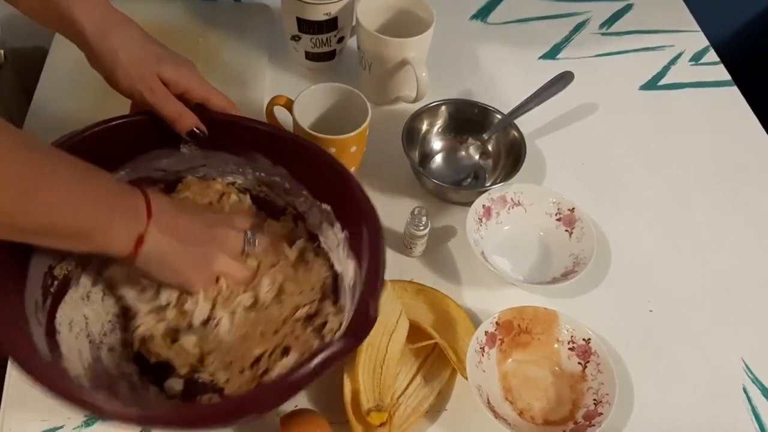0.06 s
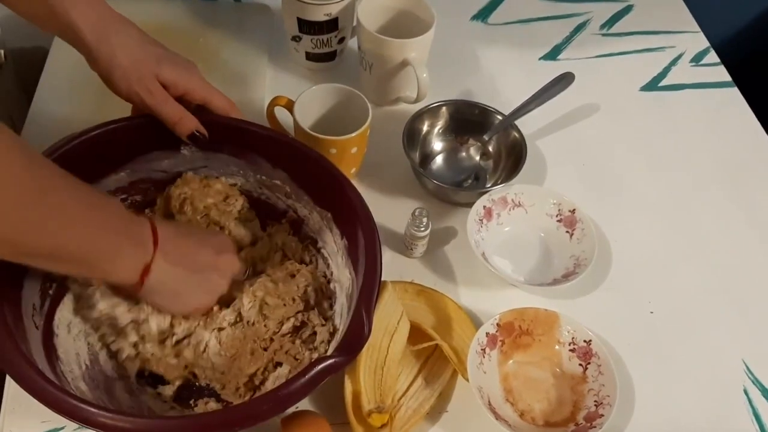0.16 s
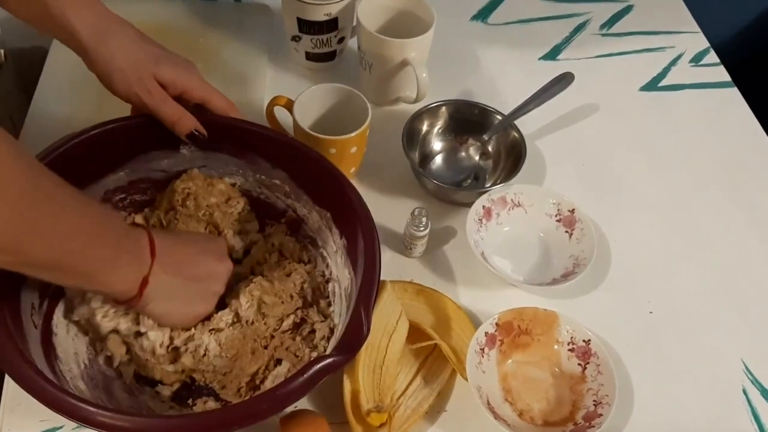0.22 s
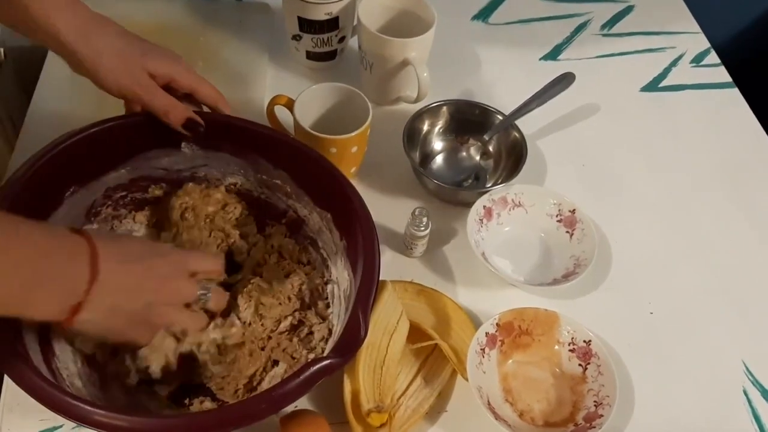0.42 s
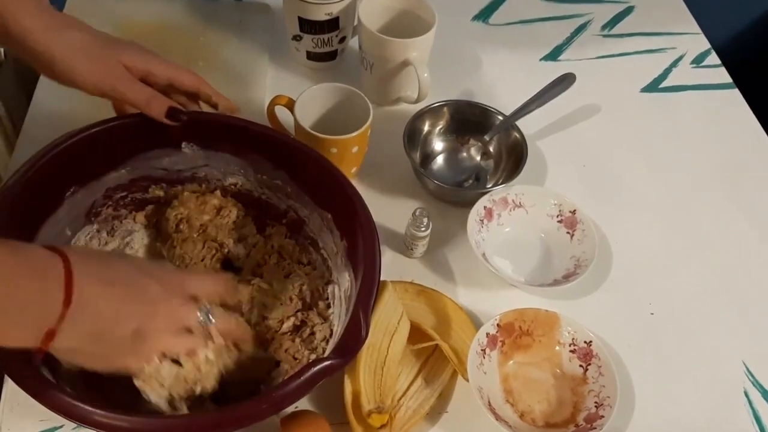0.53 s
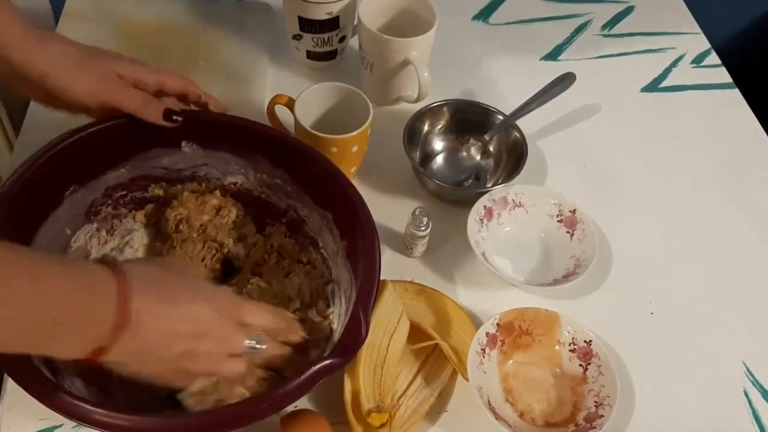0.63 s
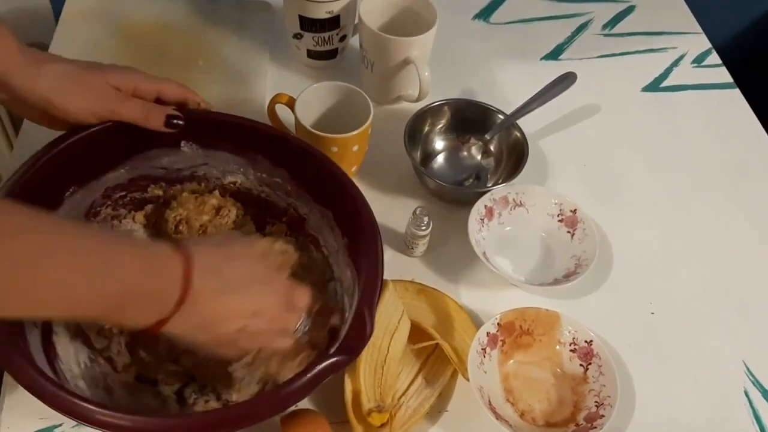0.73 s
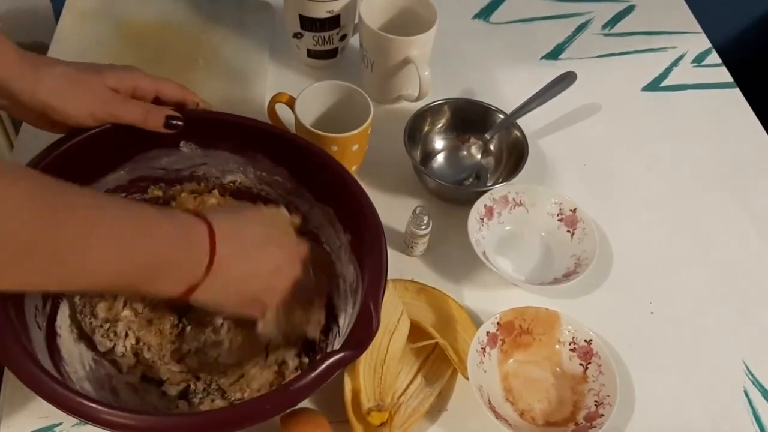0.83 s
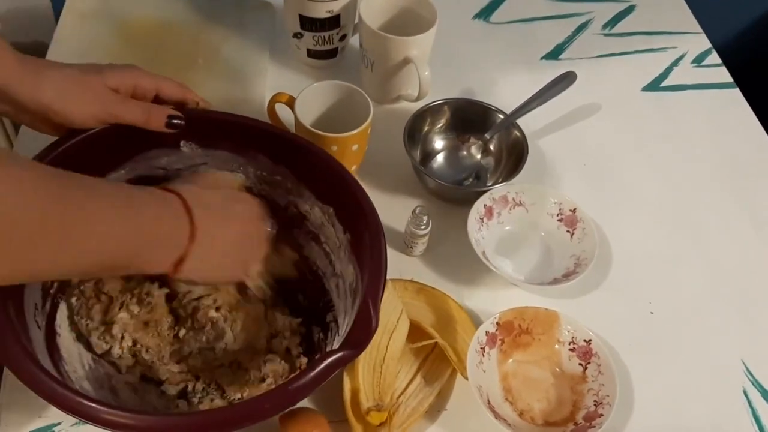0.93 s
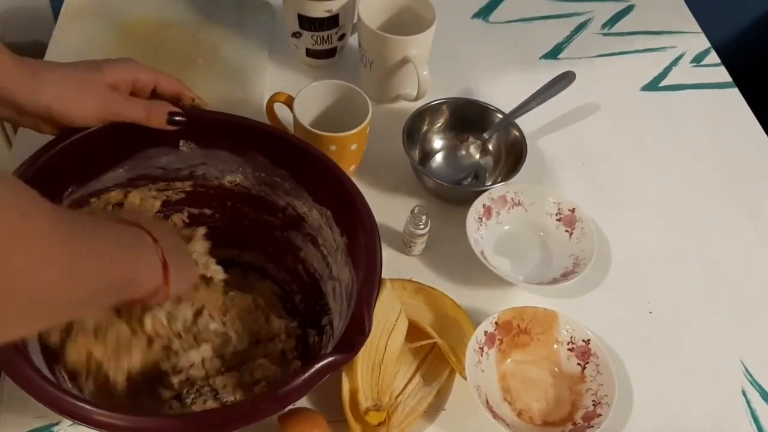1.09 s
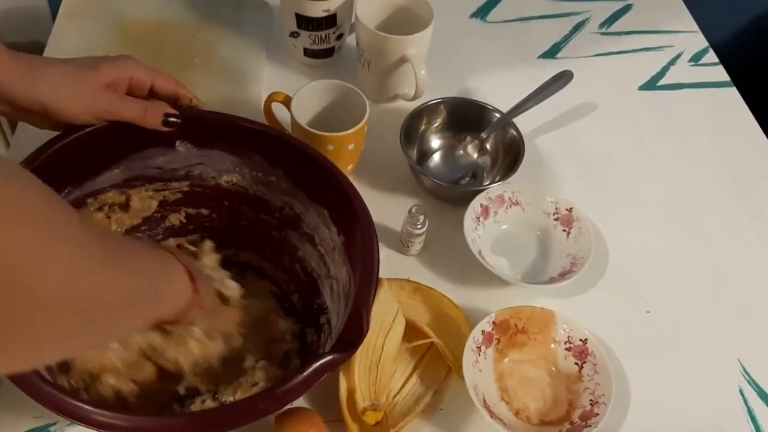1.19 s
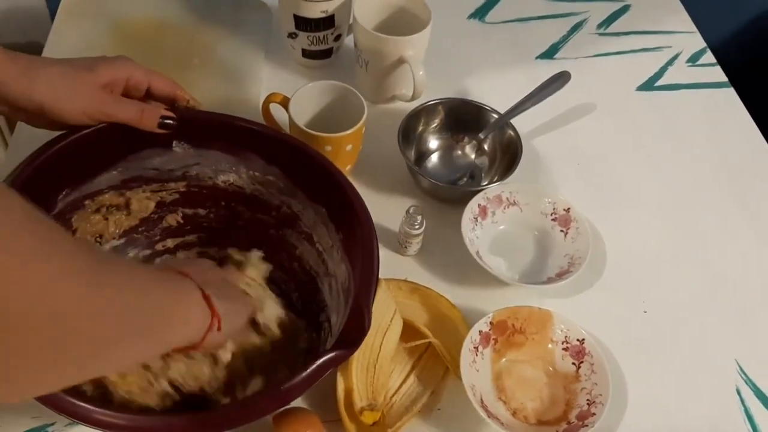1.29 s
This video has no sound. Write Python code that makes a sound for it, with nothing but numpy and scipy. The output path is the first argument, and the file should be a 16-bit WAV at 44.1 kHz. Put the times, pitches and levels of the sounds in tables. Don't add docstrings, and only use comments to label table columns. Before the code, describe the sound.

Sticky dough kneaded by hand, squishing and smacking, as the bowl bangs the table once early on

```python
import sys
import numpy as np
from scipy import signal
from scipy.io import wavfile

SR = 44100
rng = np.random.default_rng(int(sys.argv[2]) if len(sys.argv) > 2 else 0)


def persist_wave(psi):
    counts = np.round(np.clip(psi, -1, 1) * 32767).astype(np.int16)
    wavfile.write(sys.argv[1], SR, np.atleast_2d(counts).T)


def gain_from_db(level_db):
    decades = np.asarray(level_db, float) / 20
    return 10 ** decades


N = 59535
TIME = np.arange(N) / SR
LOW_PAN_DB, DOUGH_PAN_DB, KNOCK_PAN_DB = -3.5, -2, -2.5


def rms_one(x):
    return x / np.sqrt(np.mean(x ** 2) + 1e-20)


def in_time(rows):
    s, *columns = np.transpose(rows)
    return [np.interp(TIME, s, column) for column in columns]


def at_hz(points, hz):
    table_hz, values = np.array(points).T
    return np.interp(np.log(hz), np.log(table_hz), values)


def drift(rate_hz):
    r = np.exp(-80 * np.pi * rate_hz / SR)
    slow = signal.lfilter([1], [1, -2 * r, r * r], rng.standard_normal(N // 40 + 2002))[2000:]
    return np.interp(np.arange(N) / 40, np.arange(len(slow)), rms_one(slow))


def band_pass(x, low_hz, high_hz):
    return signal.sosfilt(signal.butter(2, [low_hz, high_hz], "band", fs=SR, output="sos"), x)


def ring(clicks, hz, t60):
    r, w = gain_from_db(-60 / (t60 * SR)), 2 * np.pi * hz / SR
    return signal.lfilter([0, np.sin(w)], [1, -2 * r * np.cos(w), r * r], clicks + 1e-18)


def clicks_at(s, heights):
    out = np.zeros(N)
    out[(np.asarray(s) * SR).astype(int)] = heights
    return out


def pan(db):
    return gain_from_db(np.array([[db / 2], [-db / 2]]))


def lagged(x):
    return np.array([x, np.roll(x, int(.00012 * SR))])


def noise():
    return rng.standard_normal((2, 2, N))


# f/Hz, likeness [0 to 1]
MIC_LIKENESS = [(60, 0.8), (300, 1), (1000, 0), (4000, 0), (14000, 0.083)]


def bands(spectrum, shape, white):
    out, power = 0, 0
    edges = 25 * 2 ** np.arange(0, 9.6, .5)
    for k, (low, high) in enumerate(zip(edges, edges[1:])):
        mid, side = band_pass(white[k % 2], low, high)
        hz = np.sqrt(low * high)
        alike = np.clip(at_hz(MIC_LIKENESS, hz), -1, 1)
        gain = gain_from_db(at_hz(spectrum, hz))
        power += gain ** 2 * np.mean(mid ** 2 + side ** 2)
        stereo = np.sqrt(1 + alike) * mid + np.sqrt(1 - alike) * side * [[1], [-1]]
        out = out + gain * shape(hz) * stereo
    return out / np.sqrt(power)


# f/Hz, level/dB per Hz
FLOOR_SPECTRUM = [(15, -56), (25, 1.5), (206, 2.5), (476, -3.5), (1070, -42), (1650, 8), (2050, -21),
                  (6560, -58), (16000, -38)]


def room_floor():
    return gain_from_db(-59.5) * bands(FLOOR_SPECTRUM, lambda hz: gain_from_db(1.9 * drift(26)), noise())


def rumble():
    low = band_pass(rng.standard_normal((2, N)), 59 * 0.79, 59 * 1.3)
    return gain_from_db(-71.5 + 2.0 * drift(10.0)) * rms_one((low + low[1]) * pan(3))


def kitchen(x):
    room_t60_s, wall_cut_hz = 0.31, 9000
    out, dull = np.zeros((2, N)), np.exp(-2 * np.pi * wall_cut_hz / SR)
    for k, lag in enumerate((rng.uniform(.012, .035, 16) * SR).astype(int)):
        loop, gain, state = x.copy(), gain_from_db(-60 * lag / SR / room_t60_s), [0.]
        for i in range(lag, N, lag):
            back, state = signal.lfilter([gain * (1 - dull)], [1, -dull], loop[i - lag:i], zi=state)
            loop[i:i + lag] += back[:N - i]
        out[k % 2] += (loop - x) * (-1) ** (k // 2)
    return out


# t/s, peak level/dB, f/Hz
BOWL_SHOVES = [(0.174, -43, 90), (0.174, -42, 345), (0.375, -37, 93), (.535, -46.5, 129),
               (.657, -45.5, 264), (0.682, -45, 163), (.818, -42, 537), (.825, -44.5, 344),
               (0.83, -42.5, 166.5), (0.992, -49.5, 134.5), (1.103, -39.5, 92), (1.195, -47.5, 265)]


def shoves():
    out = 0
    for s, db, hz in BOWL_SHOVES:
        tone = ring(clicks_at([s], gain_from_db(db)), hz, 17 / hz)
        out = out + ring(tone, hz * 1.5, 2.54 / hz) * hz / SR * 6
    return out


# t/s, level/dB
TABLE_PUSH = [(0, -75), (.06, -58), (.2, -66.5), (.42, -64), (.46, -46.5), (.5, -58.5), (.55, -57.5),
              (.645, -71), (.665, -55), (.72, -60.5), (.8, -63), (.83, -51.5), (.9, -64), (.95, -64.5),
              (1.0, -55), (1.07, -69), (1.2, -59.5), (1.35, -66.5)]
# f/Hz, level/dB, t60/s
TABLE_MODES = [(135, -3, 0.33), (197, -9, 0.22), (229, -2, 0.22), (302, 0, 0.16), (348, -8, 0.27),
               (448, -12, 0.15), (490, -13, .2), (530, -9, 0.08), (596, -4, 0.06), (650, -7, 0.08),
               (715, -13, 0.1), (810, -13, 0.1), (910, -13, 0.07), (162, -8, 0.25)]
# t/s, level/dB, tilt/dB per octave
BOWL_KNOCKS = [
    (0.2254, -17.5, -1),
    (0.2323, -34, -1),
    (.2420, -34, -4),
    (0.2588, -30, -1),
    (0.2639, -35.5, 0),
]


def table():
    rocks_per_s, rock_db, rock_t60_s, rock_tilt_db = 460, -37, 0.35, 3.5
    s, db, tilt_db = np.transpose(BOWL_KNOCKS)
    push_db, = in_time(TABLE_PUSH)
    t = TIME - s[0]
    rocking = (t > 0) * (rng.random(N) < rocks_per_s / SR)
    rocking = rocking * gain_from_db(rock_db - 60 * t.clip(0) / rock_t60_s)
    hit, rub = 0, 0
    for k, (hz, level_db, t60) in enumerate(TABLE_MODES):
        octaves = np.log2(hz / 300)
        knocks = clicks_at(s, gain_from_db(db + tilt_db * octaves))
        rocks = rocking * gain_from_db(rock_tilt_db * octaves) * rng.standard_normal(N)
        hit = hit + (-1) ** (k + 1) * gain_from_db(level_db) * ring(knocks + rocks, hz, t60)
        rub = rub + gain_from_db(level_db * 0.59) * ring(rng.standard_normal(N), hz, t60 * 0.39)
    return hit + rms_one(rub) * gain_from_db(push_db + 1.5 + 2.0 * drift(29))


# f/Hz, level/dB per Hz
CRACK_SPECTRUM = [(200, -18), (400, 9), (650, -3), (1200, -11), (2300, -12), (4500, -10.5), (11900, -23.5),
                  (15800, -18)]
# f/Hz, t60/s
CLATTER_DECAY = [(300, 0.3), (1000, 0.45), (4000, 0.29), (14000, 0.22)]


def clatter():
    crack_db, crack_s, crack_top_hz = -14.5, 0.0059, 6100
    clatter_db, rise_s, hold_s = -24.5, 0.0069, 0.012
    t = np.maximum(TIME - BOWL_KNOCKS[0][0], 0)
    after = np.maximum(t - hold_s, 0)
    rise = 1 - np.exp(-t / rise_s)

    def shape(hz):
        crack = gain_from_db(crack_db) * np.exp(-t / crack_s) / (1 + (hz / crack_top_hz) ** 4)
        fade_db = -60 * after / at_hz(CLATTER_DECAY, hz)
        return (t > 0) * (crack + rise * gain_from_db(clatter_db + fade_db + 2.4 * drift(53)))

    top = signal.butter(8, 14700, fs=SR, output="sos")
    return signal.sosfilt(top, bands(CRACK_SPECTRUM, shape, noise())) * pan(KNOCK_PAN_DB)


# f/Hz, level/dB, t60/s
SPOON_MODES = [(1600, -3.5, 0.026), (2138, -3.5, 0.055), (2370, 1, 0.11), (3780, 7.5, 0.035),
               (4450, -7, 0.045), (4940, 8, 0.038), (5740, -12, .07), (7130, -13, .04), (8265, -5.5, 0.061),
               (9250, -22, 0.033), (11300, 1, 0.019), (11900, 1, 0.036), (12600, -14, .03),
               (13700, -14, .03)]
# t/s, level/dB, tilt/dB per octave
SPOON_BOUNCES = [
    (0.2254, -31, -4),
    (0.2323, -33, -6),
    (.238, -37, -2.5),
    (0.2438, -38, 3.5),
    (.2465, -40, 2.5),
    (.253, -43, 1.5),
]


def spoon():
    s, db, tilt_db = np.transpose(SPOON_BOUNCES)
    out = 0
    for k, (hz, level_db, t60) in enumerate(SPOON_MODES):
        clicks = clicks_at(s, gain_from_db(db + level_db + tilt_db * np.log2(hz / 4000)))
        out = out + (-1) ** k * ring(clicks, hz, t60)
    return lagged(out) * pan(KNOCK_PAN_DB)


# f/Hz, level/dB, t60/s
WALL_HOLLOWS = [(1560, -6, .02), (1883, 0.5, 0.04), (2150, 0, 0.044), (2318, 2, 0.05), (2710, -4, 0.029),
                (3300, -3.5, 0.029), (3700, 3, 0.018), (4170, 1.5, 0.038), (4550, -1, 0.028),
                (4950, -8, 0.022)]
# start t/s, length/s, peak level/dB, favoured f/Hz
FINGER_DRAGS = [
    (.442, .04, -49, 3500),
    (.52, .07, -56, 4500),
    (.705, .065, -54, 2100),
    (.82, .05, -57, 2100),
    (.904, .04, -49, 2250),
    (1.085, .05, -53, 3000),
    (1.125, .115, -48, 3300),
]


def drags():
    slips_per_s, slip_spread_db, focus_db = 450, 3.5, 9
    out = 0
    for hz, level_db, t60 in WALL_HOLLOWS:
        stroke = 0
        for s, length, db, near_hz in FINGER_DRAGS:
            swell = np.sin(np.pi * np.clip((TIME - s) / length, 0, 1) ** 0.66)
            stroke = stroke + gain_from_db(db - focus_db * abs(np.log2(hz / near_hz))) * swell
        sizes = gain_from_db(slip_spread_db * np.minimum(rng.exponential(1, N), 3))
        slips = (rng.random(N) < slips_per_s / SR) * sizes
        ringing = rms_one(ring(slips * rng.standard_normal((2, N)), hz, t60))
        out = out + gain_from_db(level_db - 6.5) * stroke * ringing
    return out * pan(DOUGH_PAN_DB)


# t/s, peak level/dB, centre f/Hz, width/octaves, pan/dB
DOUGH_SMACKS = [(0.049, -50.5, 11700, 0.15, 10), (0.0646, -41, 1860, 0.44, -8),
                (0.1086, -44, 3600, 0.2, -10), (0.138, -51, 13000, .6, 8), (0.1734, -25, 1600, 1.17, 0.5),
                (0.1744, -32.5, 3430, 0.42, -4), (0.1738, -42.5, 6000, 0.69, -4),
                (0.1803, -35, 1900, 1.2, -4), (0.319, -27.5, 8950, 3.1, 2), (0.4328, -31.5, 10000, 1.8, 7),
                (0.4468, -37, 2460, 0.5, -2), (.4475, -42.5, 756, 0.86, -1), (0.4498, -44, 3400, 0.46, -5),
                (0.454, -40, 2500, 2.8, -1), (0.4595, -35.5, 3870, 0.36, -13.5), (.459, -43, 655, 0.57, -1),
                (0.4925, -40.5, 11500, 0.14, -5), (.5165, -35, 5500, 1.1, -6),
                (0.5182, -32, 4870, 0.32, -13), (.5196, -32, 4950, 0.34, -10),
                (.519, -38.5, 3700, 0.23, -9), (0.5186, -35.5, 7350, 0.156, -8.5),
                (.5185, -33.5, 10700, 0.48, -9), (.528, -38, 820, 0.82, 0.5),
                (0.5315, -39.5, 1760, 0.62, -1), (0.561, -49, 7900, 0.2, -8), (0.589, -40, 9100, 0.56, -6),
                (0.7076, -51.5, 2150, 0.38, -12), (.69, -49.5, 6300, 0.67, -10),
                (0.906, -32, 2240, 0.67, 4), (.909, -45.5, 1090, 0.84, 2), (.99, -41.5, 1980, 0.72, 5),
                (1.034, -39, 5470, 1.3, 0), (1.0424, -40, 6500, 1.8, -14), (1.108, -37, 3000, 1.1, -7)]


def smacks():
    puff_s, tail_db, tail_s, snap_db = .0012, -15, .01, 14
    out, t = np.zeros((2, N + SR)), TIME[:SR // 10]
    fade = np.exp(-t / puff_s) + gain_from_db(tail_db) * np.exp(-t / tail_s)
    for s, db, hz, octaves, pan_db in DOUGH_SMACKS:
        puff = rng.standard_normal((2, len(t))) * fade
        puff += gain_from_db(snap_db) * lagged(t == 0)
        spread = 2 ** (np.clip(octaves, .1, 3) / 2)
        puff = band_pass(puff, hz / spread, min(hz * spread, .45 * SR))
        i = int(s * SR)
        out[:, i:i + len(t)] += gain_from_db(db + 4) * pan(pan_db) * puff / np.abs(puff).max()
    return out[:, :N]


# t/s, rustle level/dB, brightness/dB
KNEADING = [(0, -66, 5), (.05, -54, -3.5), (.11, -49.5, -5), (.2, -46.5, -7.5), (.4, -58, 2.5),
            (.435, -55.5, -4), (.452, -48, -1), (.5, -50.5, 1.5), (.585, -56, 5), (.61, -64, 5.5),
            (.745, -63, -2), (.77, -56, -1.5), (.85, -51.5, -6.5), (.95, -50, -2.5), (1.07, -49, -0.5),
            (1.16, -44.5, -3), (1.24, -48.5, -4), (1.35, -59, 0)]
# f/Hz, level/dB per Hz
RUSTLE_SPECTRUM = [(500, -22.5), (1050, -10), (1500, -6.5), (2150, -0.5), (2900, -7), (4300, -2.5),
                   (6000, -8), (15500, -14.5)]


def rustle():
    grains_per_s, grain_spread_db, grain_samples = 1800, 2.4, 8.0
    grain_db, smooth_db = -11, -2
    level_db, bright_db = in_time(KNEADING)
    sizes = gain_from_db(grain_spread_db * np.minimum(rng.exponential(1, N), 5))
    tears = sizes * (rng.random(N) < grains_per_s * gain_from_db(3 * drift(20)) / SR)
    grains = rms_one(signal.lfilter([1], [1, -np.exp(-1 / grain_samples)], tears))
    drive = noise() * (gain_from_db(grain_db) * grains + gain_from_db(smooth_db))

    def shape(hz):
        return gain_from_db(bright_db * np.log2(hz / 2500) / 2 + 1.0 * drift(25))

    return bands(RUSTLE_SPECTRUM, shape, drive) * gain_from_db(level_db + 3) * pan(DOUGH_PAN_DB)


def scene():
    soft = signal.lfilter(*signal.butter(2, 2500, fs=SR), table() + shoves())
    near = soft * pan(LOW_PAN_DB) + spoon() + smacks()
    walls = signal.lfilter(*signal.butter(1, 270, "high", fs=SR), kitchen(near.mean(axis=0)))
    return near + gain_from_db(-15.5) * walls + clatter() + rustle() + room_floor() + drags()


def top_cut(x):
    return signal.sosfilt(signal.butter(12, 16480, fs=SR, output="sos"), x)


def record(dry):
    peak_top = 0.37
    mix = signal.sosfilt(signal.butter(4, 101, "high", fs=SR, output="sos"), dry)
    mix = peak_top * np.tanh(mix / peak_top)
    mix = mix + rumble()
    mix = signal.sosfilt(signal.ellip(10, .5, 60, 15900, fs=SR, output="sos"), mix)
    return top_cut(mix)


dry = scene()
out = record(dry)
persist_wave(out)
```